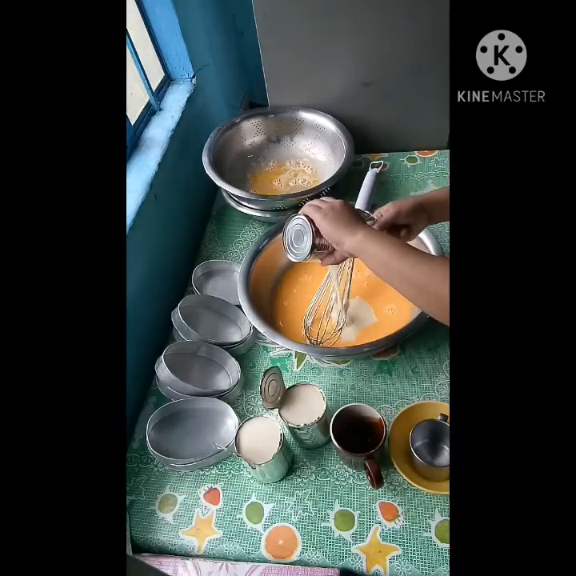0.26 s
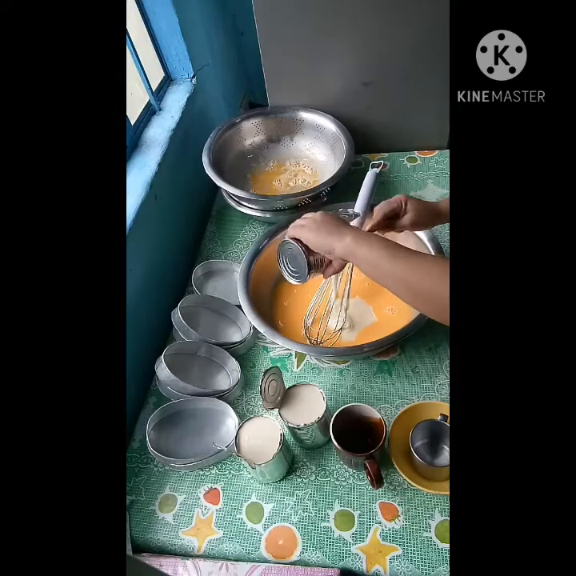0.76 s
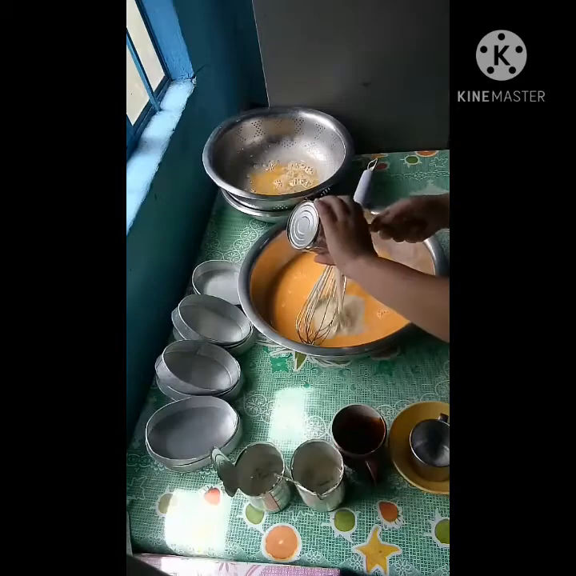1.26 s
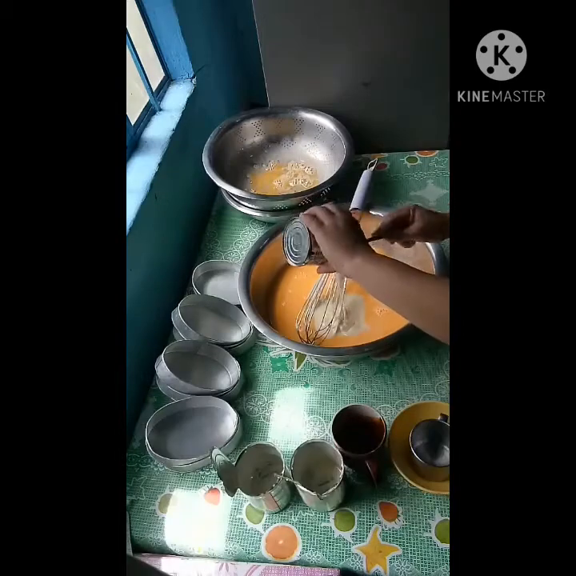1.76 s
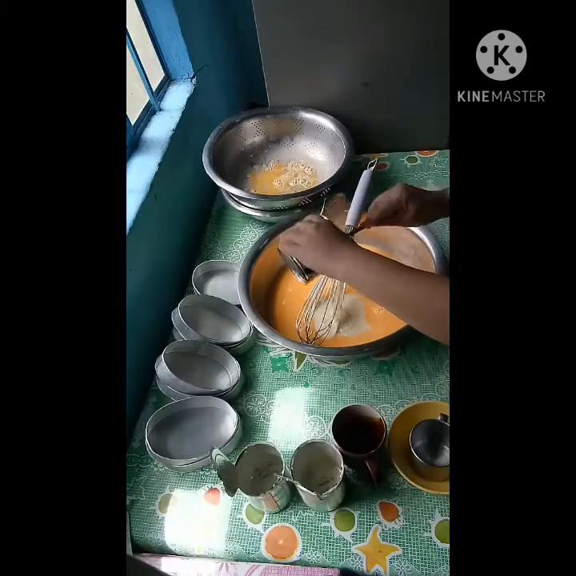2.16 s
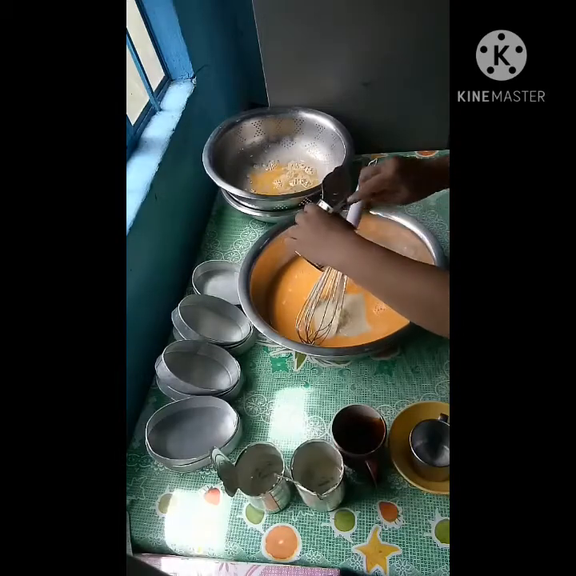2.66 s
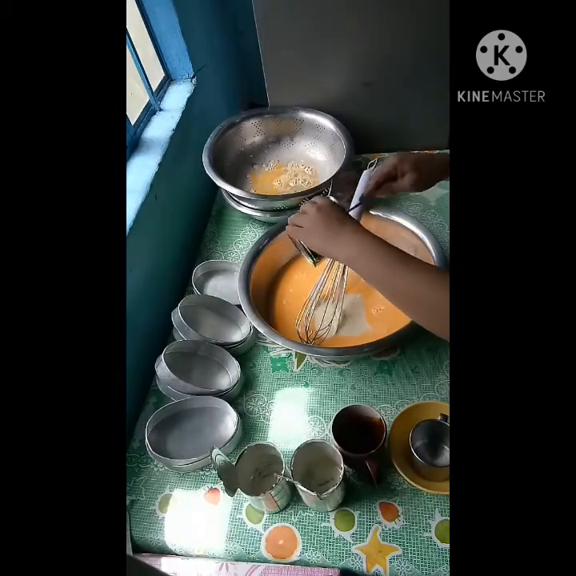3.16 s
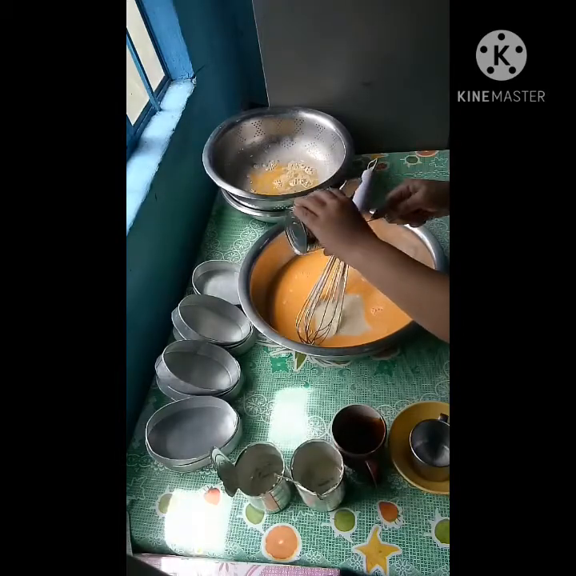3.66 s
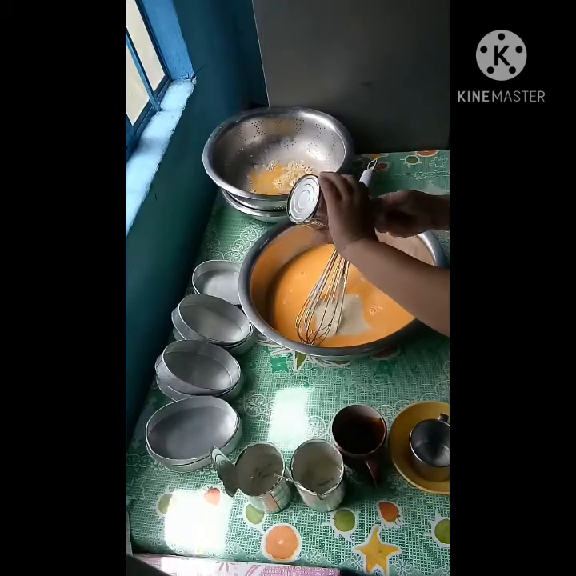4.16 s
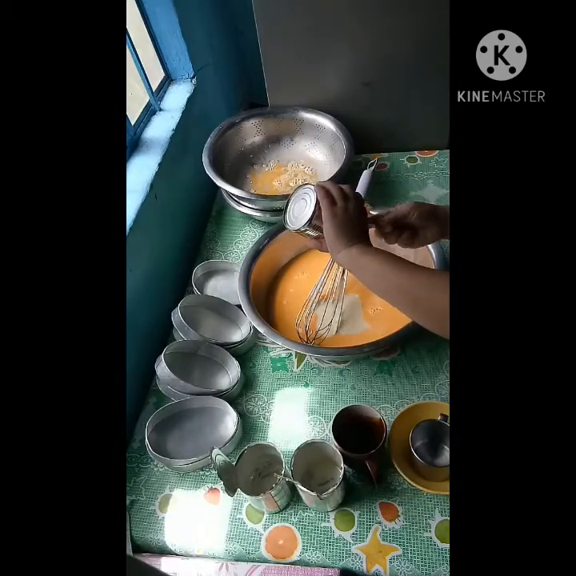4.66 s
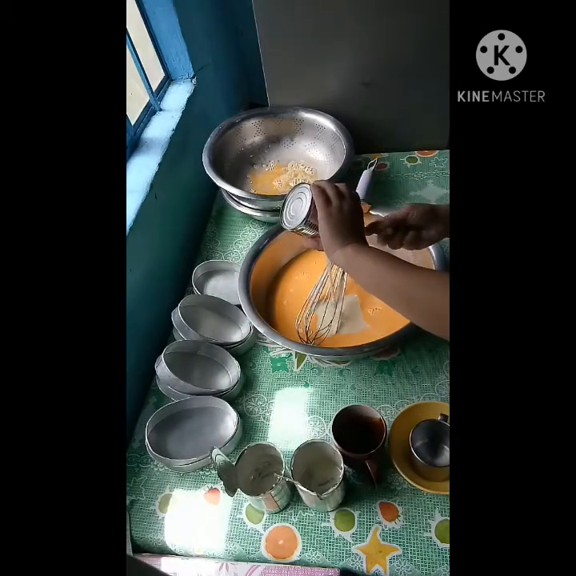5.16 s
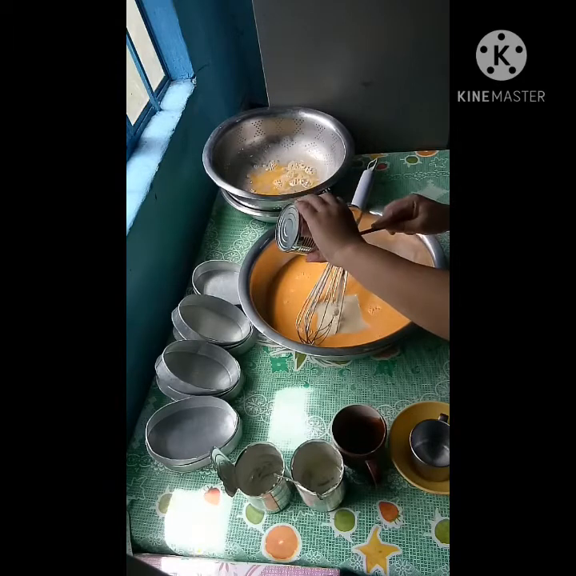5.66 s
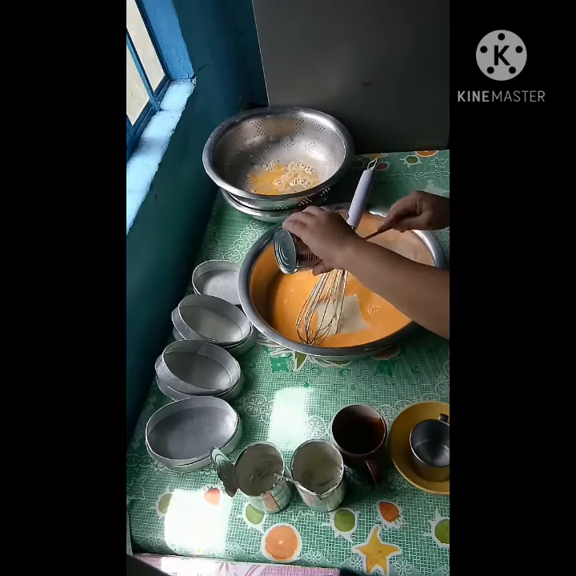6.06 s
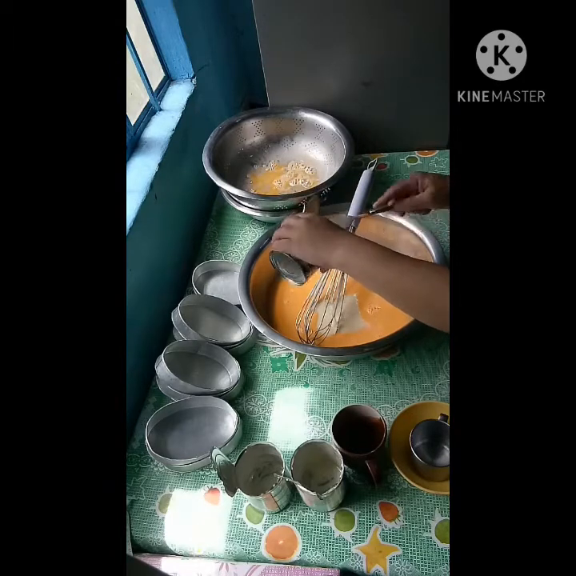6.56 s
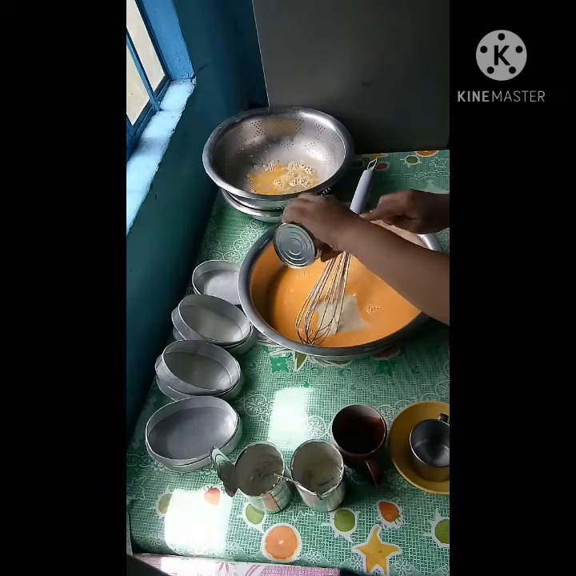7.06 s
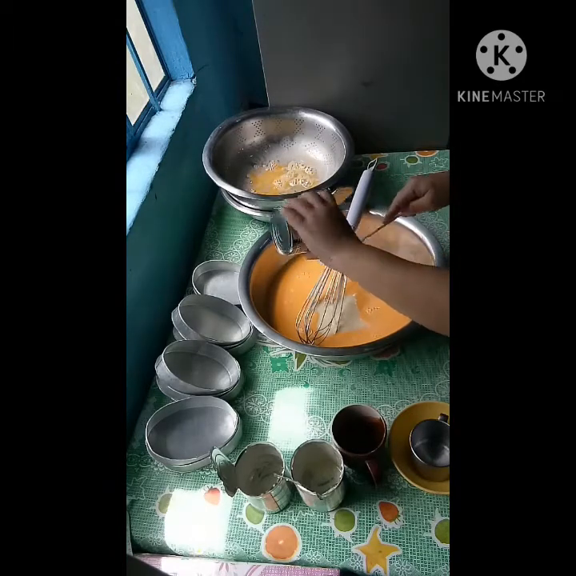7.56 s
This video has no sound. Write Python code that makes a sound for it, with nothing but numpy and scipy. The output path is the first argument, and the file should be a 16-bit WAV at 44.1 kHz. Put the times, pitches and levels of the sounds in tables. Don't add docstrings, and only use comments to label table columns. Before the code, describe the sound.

Bright, dry clanks and gritty scrapes of steel against thin tin cans, irregular and close, over quiet room tone with distant traffic and birds outside.

```python
import sys
import numpy as np
from scipy import signal
from scipy.fft import rfft, irfft, next_fast_len
from scipy.io import wavfile
from scipy.ndimage import uniform_filter1d, map_coordinates

SR = 44100
rng = np.random.default_rng(int(sys.argv[2]) if len(sys.argv) > 2 else 0)


def volts_from_db(level):
    exponent = np.asarray(level, float) / 20
    return 10 ** exponent


def transcribe(u):
    v = np.clip(np.atleast_2d(u).T, -1, 1)
    q = np.round(v * 32767).astype(np.int16)
    wavfile.write(sys.argv[1], SR, q)


N = 344421


def unit(x):
    return x / np.sqrt(np.mean(x ** 2) + 1e-20)


def along(points, hz):
    f, v = np.transpose(points)
    return np.interp(np.log(hz + 1), np.log(f + 1), v)


def curves(rows):
    s, *cols = np.transpose(rows)
    return [np.interp(np.arange(N) / SR, s, c) for c in cols]


def wobble(rate):
    knots = rng.standard_normal(int(N * rate / SR) + 4)
    return map_coordinates(knots, [np.arange(N) * rate / SR])


def filtered(x, response):
    m = 2 * next_fast_len(x.shape[-1] // 2 + 2048)
    spectrum = rfft(x, m) * response(np.fft.rfftfreq(m, 1 / SR))
    return irfft(spectrum, m)[..., :x.shape[-1]]


def causal(gain):
    cep = irfft(np.log(gain + 1e-6))
    half = len(cep) // 2
    folded = np.r_[cep[0], 2 * cep[1:half], np.zeros(len(cep) - half)]
    return np.exp(rfft(folded, 2 * len(gain) - 2))


def peak_db(t, s, rise, fall):
    before = (s - t) / np.maximum(rise, .003)
    after = (t - s) / np.maximum(fall, .02)
    return -20 * np.maximum(before, after)


# frequency in Hz, level in dB.
AIR_SPECTRUM = [(76, -34), (130, -8), (238, -11.5), (303, -11.5), (1010, -23), (1310, -25.5), (5480, -27),
                (8190, -39), (15000, -37.5), (15500, -28)]
# top in seconds, level in dB, time to rise or fall 20 dB in seconds.
TRAFFIC_SWELLS = [
    (.68, -42.5, 0.5),
    (1.8, -49, 0.2),
    (3.27, -60, 2),
    (3.85, -45, .5),
    (5.2, -53, 1),
    (7.57, -57, 1.3),
]
AIR_DB, RUMBLE_DB = -56.5, -60.5


def background():
    air = unit(filtered(rng.standard_normal(N), lambda f: volts_from_db(along(AIR_SPECTRUM, f)) * (f > 130)))
    rumble_db = [(15, -5.5), (55, -2.5), (73, 9.5), (92, 6.5), (150, -9.0), (300, -50.5)]
    low = filtered(rng.standard_normal(N), lambda f: volts_from_db(along(rumble_db, f)))
    t = np.arange(N) / SR
    swells = sum(volts_from_db(db - 6.5 + peak_db(t, s, fall, fall)) for s, db, fall in TRAFFIC_SWELLS)
    traffic = volts_from_db(RUMBLE_DB) + swells
    breeze = volts_from_db(1.0 * wobble(8.9))
    lumps = volts_from_db(1.6 * wobble(8.7))
    return volts_from_db(AIR_DB) * breeze * air + traffic * unit(lumps * low)


GRIP_STARTS = [0, 1.06, 1.66, 2.15, 3.97, 7.8]
# start in seconds, wall mode in Hz, bottom mode in Hz, upper mode in Hz.
STROKE_SPOTS = [(0, 406.2, 707.6, 2640), (0.11, 521.5, 708, 2870), (0.24, 510, 709, 3460),
                (0.36, 524, 722, 2570), (0.536, 404.3, 836, 2850), (0.682, 431.7, 733, 3058),
                (0.775, 403, 715, 2840), (0.856, 412, 709, 2480), (1.078, 364, 795, 2520),
                (1.204, 470, 707, 1820), (1.29, 365, 1035, 1880), (1.348, 335, 785, 2160),
                (1.42, 317, 726, 1739), (1.52, 380, 722, 5310), (1.595, 370, 735, 2630),
                (1.682, 357, 1029, 2776), (1.778, 357, 785, 3570), (1.861, 354, 785, 3430),
                (2.207, 317, 786, 2540), (2.424, 372, 842.6, 3003), (2.544, 345, 730, 4210),
                (2.67, 305, 785, 4600), (2.78, 382, 872, 2600), (2.92, 374, 845.7, 3820),
                (3.159, 521, 820, 4040), (3.385, 313, 817.5, 3907), (3.614, 393, 762, 4420),
                (3.733, 530, 824, 3650), (3.833, 430, 827, 1940), (3.976, 434, 785, 2820),
                (4.18, 423, 834, 2470), (4.295, 436, 1017, 4820), (4.395, 460, 768.6, 2200),
                (4.527, 439.5, 808, 3840), (4.751, 451, 812, 2690), (5.007, 450, 785, 3601),
                (5.262, 436.7, 791, 3000), (5.521, 463, 772, 2870), (5.737, 462, 770, 3360),
                (5.952, 450, 800, 2920), (6.316, 470.7, 874, 3780), (6.741, 468, 785, 3970),
                (6.815, 482, 1000, 2840), (6.919, 466, 1000, 2910), (7.069, 442, 785, 2944),
                (7.26, 470, 780, 2950), (7.356, 470, 761, 2960)]


def stroke_at(s):
    stroke = np.searchsorted(np.transpose(STROKE_SPOTS)[0], s + .005) - 1
    grip = np.searchsorted(GRIP_STARTS, s) - 1
    return max(stroke, 0), max(grip, 0)


def modes(f, table, scatter_db, detune):
    luck = np.clip(rng.standard_normal((9, 2)), -1.5, 1.5)
    total = 0
    for k, ((hz, width, db), (strength, shift)) in enumerate(zip(table, luck)):
        centre = hz * (1 + detune * shift)
        resonance = 1j * f * width / (centre ** 2 - f * f + 1j * f * width)
        total = total + (-1) ** k * volts_from_db(db + scatter_db * strength) * resonance
    return total


# frequency in Hz, width in Hz, level in dB.
WALL_MODES = [
    [(419, 36, 2), (543.5, 12, -6)],
    [(357, 54, 0.5), (424, 20, -1)],
    [(403.5, 51, -9), (301.6, 16, -3)],
    [(453.4, 6.9, 1.5), (310, 26, -27)],
]
# frequency in Hz, width in Hz, level in dB.
BOTTOM_MODES = [
    [(733, 21, 5), (805, 7, 1.5), (870, 570, -12), (1190, 35, -16)],
    [(724.6, 26, 5), (602, 10, -24), (1062, 140, -13.5)],
    [(785, 61, -3.5), (891, 21, -12), (1066, 50, -17)],
    [(740, 143, -9.5), (785, 40, -0.5), (834, 40, -2), (872, 74, -1), (934, 52, -0.5), (1071, 190, -8),
     (1270, 132, -20.5)],
    [(633, 16.4, -11), (795, 23, -2.5), (841, 23, 1.5), (890.4, 39, -1), (1013, 87, -1), (1033, 105, 0),
     (1144, 170, -7)],
]
# frequency in Hz, width in Hz, level in dB.
UPPER_MODES = [
    [(2450, 310, 1), (2950, 120, 1), (3180, 250, -1.5), (4500, 53, -24)],
    [(1806, 66, -3.5), (2880, 180, 0), (3550, 120, 0.5), (5500, 71, -8)],
    [(1717, 110, -1), (2236, 77, -14.5), (2740, 50, -37.5), (4070, 58, 2), (4570, 350, -12.5)],
    [(1802, 186, -1), (1910, 170, -4.5), (2400, 650, -3), (2904, 88, -5.5), (3390, 300, 4)],
]
# frequency in Hz, level in dB.
SHEET_SPECTRUM = [(760, -6.5), (1300, -2.5), (1480, -6.5), (2920, -3.5), (6540, -6.5), (7400, -32),
                  (9620, -64.5), (16300, -120)]
# frequency in Hz, level in dB.
EDGE_SPECTRUM = [(5500, -58.5), (6800, -9.5), (7700, -13), (10000, -7), (13300, -18.5), (14200, -12.5),
                 (14900, -4.5), (15500, -7.5)]
CAN_IN_GRIP = [0, 1, 1, 2, 3]
# width in Hz, level in dB.
FAVOURED_MODE = [
    (20, 4),
    (32, 3.5),
    (150, 1.5),
]


def tin(s, scatter_db, detune, spot_db):
    stroke, grip = stroke_at(s)
    can = CAN_IN_GRIP[grip]
    families = []
    for table, hz, lead in zip([WALL_MODES[can], BOTTOM_MODES[grip], UPPER_MODES[can]],
                               STROKE_SPOTS[stroke][1:], FAVOURED_MODE):
        others = [m for m in table if abs(m[0] / hz - 1) > .035]
        families.append(others + [(hz, *lead)])
    wall, bottom, upper = families
    spot = rng.standard_normal(60)
    spot_hz = np.linspace(0, SR / 2, len(spot))

    def response(f):
        groups = volts_from_db(spot_db * np.interp(f, spot_hz, spot))
        radiates = (1j * f / (310 + 1j * f)) ** 2
        sheet = causal(groups * volts_from_db(along(SHEET_SPECTRUM, f)))
        return radiates * np.array([
            modes(f, upper, scatter_db, detune) * volts_from_db(-2.0) + sheet,
            modes(f, wall, scatter_db, detune / 4),
            modes(f, bottom, scatter_db, detune / 4),
            causal(np.sqrt(groups) * volts_from_db(along(EDGE_SPECTRUM, f)))])
    return response


def patchy(depth_db, size):
    z = signal.stft(rng.standard_normal(N), nperseg=size)[2]
    field = uniform_filter1d(rng.standard_normal(z.shape), 2, axis=0)
    field = uniform_filter1d(field, 7, axis=1)
    return signal.istft(z * volts_from_db(depth_db * unit(field)), nperseg=size)[1][:N]


# start in seconds, rasp in dB, time to fall 20 dB
# in seconds, wall in dB, bottom in dB.
DRAG_STROKES = [(0, -28, 0.2, -1.5, -9.5), (.262, -31.5, 0.23, -11, -9), (1.09, -31, 0.14, -14, 0.5),
                (1.215, -30, 0.27, -6.5, 0), (1.428, -38, 0.16, 0, 10.5), (1.602, -43.5, 0.3, -17, 7),
                (2.218, -29, 0.12, -21.5, -3.5), (2.437, -27, -0.21, -9, 0), (2.682, -24.5, 0.16, -10, -3),
                (3.17, -30.5, 0.17, -17.5, 4.5), (3.4, -34, 0.3, -5, 4), (3.625, -27, 0.12, -8, 4),
                (3.844, -42, 0.7, 2, 9), (4.04, -29, 0.41, -3.5, 2.5), (4.268, -25.5, 0.34, -8, -8),
                (4.762, -25, 0.2, -2, 2), (5.015, -28, 0.26, -5, -1.5), (5.27, -30, 0.47, -4, -8),
                (6.329, -32.5, 0.19, -4, -8), (6.755, -30, 0.07, -6, 11), (6.935, -37.5, 0.62, -18, -2),
                (7.087, -35, 0.32, 3, -1.5), (7.376, -38, 0.1, 11.5, 0)]
# top in seconds, rasp in dB, time to fall 20 dB in seconds,
# wall in dB, bottom in dB.
SWEEP_STROKES = [(.57, -35.5, 0.52, -6, -6), (.675, -26, 0.14, -1.5, -7), (.788, -25, -0.0235, -1, 0.5),
                 (.868, -33.5, 0.07, 0.5, -10.5), (1.535, -30.5, 0.1454, -16.5, 1.5),
                 (1.7, -30, 0.17, -31, -2.5), (1.79, -31.5, 0.22, -5, 6.5), (1.89, -25.5, 0.11, -6.5, 3),
                 (2.559, -27, 0.08, -14, -4), (2.784, -29.5, 0.09, -5, 1.5), (3.018, -32, 0.11, -12.5, 3.5),
                 (3.99, -32.5, 0.04, -30, -8), (4.4, -27.5, 0.25, -8, 0), (4.659, -32, 0.12, -13, 3),
                 (5.52, -33.5, 0.13, -12, 1), (5.6, -21, 0.07, 2.5, -2.5), (5.765, -28.5, 0.0827, 5.5, 8),
                 (5.95, -38, 0.1143, -7, 7.5), (6.4, -25.5, 0.03, -13, -2.5), (6.89, -33, 0.04, -10, -1),
                 (7.28, -43.5, 0.07, 10.5, 5)]
LINGER_RATIO = [0.96, 0.58, 1, 0.81]
GRIP_RASP_EDGE_DB = [-0.36, -1, -1.2, -1.2, 0.96]
DRAG_RISE_S, SWEEP_RISE = 0.016, 0.9
GENTLE_FROM_S, GENTLE_EDGE_DB = 5, -4


def pressure():
    t = np.arange(0, N / SR + .002, .002)
    power = 1e-12
    for rows, sudden in [(DRAG_STROKES, True), (SWEEP_STROKES, False)]:
        for s, db, fall, wall_db, bottom_db in rows:
            grip = max(np.searchsorted(GRIP_STARTS, s) - 1, 0)
            edge_db = GRIP_RASP_EDGE_DB[grip] + GENTLE_EDGE_DB * (s > GENTLE_FROM_S)
            rise = DRAG_RISE_S if sudden else SWEEP_RISE * fall
            shape_db = peak_db(t, s, rise, fall * np.c_[LINGER_RATIO])
            power = power + volts_from_db(2 * (db + np.c_[[0, wall_db, bottom_db, edge_db]] + shape_db))
    return np.array(curves(np.c_[t, np.sqrt(power).T]))


STROKE_EDGE = [1, 2.5, 1.5, -5, -1, -3.5, -2, -5, -2, 1, -0.5, -1.5, 1.5, -1, -4, 1.5, -1.5, 0.5, -3, 2, -2,
               2, -1.5, 1.5, 4, 3, 4.5, -0.5, 0.5, 0, 0, 2.5, -0.5, -0.5, 0.5, 3, -0.5, 1, 4, 1.5, 1.5, 0.5,
               4.5, -1, -3.5, -1, -1]


def scrape():
    chatter = volts_from_db(1.8 * wobble(30) + 2.5 * wobble(110) + 2 * wobble(600))
    bumps = volts_from_db(3 * wobble(35))
    steady = np.ones(N)
    grains = patchy(depth_db=3.0, size=512)
    force = chatter * np.array([steady, bumps, bumps, steady]) * grains
    shares = pressure() * volts_from_db(np.c_[[-3.5, -5, -5.5, -3.5]])
    out, t = np.zeros(N), np.arange(N) / SR
    starts = [row[0] for row in STROKE_SPOTS]
    for a, b, edge_db in zip(starts, starts[1:] + [N / SR], STROKE_EDGE):
        here = slice(max(round((a - .06) * SR), 0), round((b + .01) * SR))
        parts = filtered(force[:, here], tin(a, scatter_db=2, detune=0.02, spot_db=1.4))
        fade_in = (t[here] - a) / .01 + (1 if a > .05 else 9)
        fade_out = (b - t[here]) / .01 + 1
        fade = np.sqrt(np.clip(np.minimum(fade_in, fade_out), 0, 1))
        gains = shares[:, here] * volts_from_db(np.c_[[0, 0, 0, edge_db]])
        out[here] += fade * sum(g * unit(p) for g, p in zip(gains, parts))
    return out


# start in seconds, peak in dB, bottom in dB, contact t60 in seconds.
FIRST_CAN_TAPS = [(.026, -19.5, -7, 0.016), (.1156, -15.5, -12.5, 0.062), (0.2414, -12.5, -11.5, 0.022),
                  (.2612, -13, -5, 0.018), (.3168, -18, -5.5, 0.029), (0.3645, -13, -15.5, 0.037),
                  (0.5358, -24, -23, 0.091), (0.685, -6, -16, 0.045), (0.7799, -17, -12, 0.095),
                  (0.8587, -15, -17, 0.064)]
SECOND_CAN_TAPS = [(1.2052, -10.5, 0, 0.025), (1.2915, -22, -11, 0.15), (1.3495, -18.5, -12.5, 0.016),
                   (1.4217, -17, -5.5, 0.027), (1.5968, -30.5, 9.5, 0.0063), (1.8634, -28.5, -7, 0.016),
                   (1.954, -27.5, 0.5, 0.093)]
THIRD_CAN_TAPS = [(2.2079, -6, -7, 0.037), (2.4243, -4.5, -3, 0.024), (2.4923, -16.5, -9, 0.15),
                  (2.5468, -18.5, -5.5, 0.13), (2.6703, -3.5, -4, 0.034), (2.7171, -12, -8.5, 0.013),
                  (2.7824, -23, -1.5, .014), (2.9223, -25.5, -6.5, 0.093), (3.0094, -32.5, 4, 0.021),
                  (3.158, -11.5, 1.5, 0.044), (3.251, -22, -6, 0.098), (3.375, -29.5, 1.5, 0.042),
                  (3.386, -12, -4, 0.019), (3.462, -18.5, -8, 0.014), (3.5208, -25, -6.5, 0.019),
                  (3.5955, -31.5, 7, 0.018), (3.6133, -4.5, -13.5, 0.015), (3.7334, -21.5, -2, 0.041),
                  (3.8334, -19, 4.5, 0.03)]
FOURTH_CAN_TAPS = [(4.0302, -12.5, -5.5, 0.013), (4.1091, -17, -11.5, 0.015), (4.1786, -23, -5, 0.071),
                   (4.244, -11, -9, 0.052), (4.2667, -15.5, -4.5, 0.019), (4.295, -5.5, -8, 0.0084),
                   (4.3949, -18, -0.5, 0.038), (4.438, -11, -11.5, 0.013), (4.527, -23.5, 3, 0.024),
                   (4.653, -17, -26.5, 0.03), (4.7496, -13.5, -7, 0.033), (4.7694, -12.5, -9.5, 0.022),
                   (5.003, -14, -4.5, 0.039), (5.0081, -5.5, -15, 0.011), (5.1198, -19.5, -3.5, 0.07),
                   (5.2613, -7, -7.5, 0.037), (5.3084, -11.5, -8.5, 0.092), (5.3716, -18, 0, 0.042),
                   (5.5816, -13, -13.5, 0.016), (5.7427, -25, -8, 0.027), (5.7848, -13.5, -11, 0.028),
                   (5.9526, -16, -10, 0.059),
                   (6.3179, -17.5, -5.5, 0.015), (6.7415, -16.5, -9, 0.02), (6.752, -12, -30.5, 0.038),
             (6.8141, -18.5, -5, 0.022), (6.9194, -7.5, -25.5, 0.033), (7.0199, -26.5, -4.5, 0.0415),
             (7.0691, -13, -27, 0.057), (7.2602, -30, 2, 0.05), (7.356, -23, -7.5, 0.096),
             (7.4133, -26.5, -21, 0.017)]
# start in seconds, peak in dB, bottom in dB, contact t60 in seconds.
SMALL_CONTACTS = [
    (0.444, -23, -26, 0.031),
    (1.4, -26.5, -9, 0.013),
    (5.147, -20, -13, 0.016),
    (5.399, -18.5, -8.5, 0.063),
    (7.13, -28, -15, 0.013),
                  (.1027, -27, -16.5, 0.016), (.338, -18, -8, 0.019), (.5028, -36, -14, .01),
                (.6345, -23, -11, 0.023), (.7562, -15.5, -6, 0.053), (.85, -17, -10, 0.014),
                (.9792, -34, -29, 0.0089), (1.0914, -24.5, -5.5, 0.023), (1.3249, -24.5, -9, 0.011),
                (1.5184, -30.5, 1, 0.016), (1.6601, -32.5, -10, 0.016), (1.6796, -29, -8.5, 0.017),
                (1.8816, -16.5, -7.5, 0.02), (2.6592, -24, -33.5, 0.0046), (2.693, -28, -5, 0.02),
                (2.7619, -18.5, -20, .02), (2.9884, -22.5, -15.5, 0.014), (3.038, -28, 0.5, 0.0085),
                (3.9822, -29, -11, 0.036), (4.134, -26.5, 3, 0.013), (4.6038, -27, 0.5, .02),
                (4.6975, -26, -7, 0.013), (4.7584, -18, -7, 0.015), (4.8841, -19, -10, 0.041),
                (5.038, -18, -5, .01), (5.082, -23, -1.5, .015), (5.4798, -27.5, -8, 0.009),
                (5.5022, -27.5, -9.5, 0.014), (5.5297, -19, -9, 0.021), (5.607, -15.5, -5.5, 0.012),
                (5.7177, -30, -18, 0.0063), (5.734, -16.5, -4, 0.022), (5.7731, -19, -1, 0.006),
                (5.9208, -35, -22, 0.012), (6.8826, -26.5, -3.5, 0.018), (6.898, -26.5, -1, 0.013)]
# wall in dB, edge in dB.
GRIP_FREEDOM = [
    (-14, -12),
    (-23.5, -11.5),
    (-19, -17),
    (-26, -14.5),
    (-15, -18),
]
WALL_FOLLOWS, EDGE_YIELDS = 0.27, 0.18
PUSH_S, PUSH = 0.001486, 2.07


def taps():
    out, t = np.zeros(N + SR), np.arange(SR // 7) / SR
    contacts = (FIRST_CAN_TAPS + SECOND_CAN_TAPS + THIRD_CAN_TAPS + FOURTH_CAN_TAPS + SMALL_CONTACTS)
    for s, db, bottom_db, t60 in contacts:
        stroke, grip = stroke_at(s)
        wall_db = GRIP_FREEDOM[grip][0] + WALL_FOLLOWS * bottom_db
        edge_db = GRIP_FREEDOM[grip][1] - EDGE_YIELDS * bottom_db + STROKE_EDGE[stroke]
        lasting = np.clip(t60, .006, .2) * np.array([[1], [.2], [.2], [.9]])
        force = rng.standard_normal(len(t)) * volts_from_db(-60 * t / lasting) * (1 - np.exp(-t / 0.0021))
        force[1:3, round(PUSH_S * SR)] += PUSH * np.sqrt(np.sum(force[1] ** 2) / 4)
        parts = filtered(force, tin(s, scatter_db=2.5, detune=0.02, spot_db=2.3))
        parts = parts / np.abs(parts).max(axis=1, keepdims=True)
        levels = volts_from_db(db + np.array([-1, wall_db + 4.5, bottom_db + 4, edge_db + 7.5]))
        out[round(s * SR):][:len(t)] += levels @ parts
    return out[:N]


# frequency in Hz, t60 in seconds.
KITCHEN_DECAY = [(200, 0.5), (800, 0.24), (4000, 0.23), (12000, 0.26)]


def room(x):
    out, step = np.zeros(N + SR), SR // 4
    for start in range(0, N, step):
        hz, t, z = signal.stft(rng.standard_normal(SR // 2), SR, nperseg=256)
        decay = volts_from_db(-60 * t / along(KITCHEN_DECAY, hz)[:, None])
        tail = signal.istft(z * decay, SR, nperseg=256)[1]
        wet = signal.fftconvolve(x[start:start + step], tail / np.linalg.norm(tail))
        out[start + 220:][:len(wet)] += wet
    return out[:N]


# start in seconds, end in seconds,
# share of the bands from 4.5 to 11 kHz.
WIDE_STRETCHES = [(0, 1.03, .3), (1.2, 1.24, .9), (2.2, 2.22, 1), (2.41, 2.45, 1), (2.66, 2.68, 1),
                  (2.91, 3.61, .4), (4.16, 4.23, .9), (4.28, 4.33, 1), (4.99, 6.07, .3), (6.31, 6.41, .5),
                  (6.75, 7.5, .35)]


def wide_treble(x):
    hz, t, z = signal.stft(x, SR, nperseg=512)
    share = sum(part * ((t > a) & (t < b)) for a, b, part in WIDE_STRETCHES)
    luck = np.kron(rng.random((34, len(t) // 8 + 1)), np.ones((8, 8)))[:len(hz), :len(t)]
    f = hz[:, None]
    on = np.where((f > 11000) & (f < 14500), share > 0, (luck < share) & (f > 4500))
    strength = np.sqrt(np.abs(uniform_filter1d(np.abs(z) ** 2, 7, axis=0)))
    noise = signal.stft(rng.standard_normal(N), nperseg=512)[2]
    noise = noise / np.sqrt(np.mean(np.abs(noise) ** 2))
    return signal.istft(on * strength * noise, nperseg=512)[1][:N]


# start in seconds, end in seconds.
CUT_SILENCE = (1.0425, 1.081)


def cut(x):
    t = np.arange(N) / SR
    burst = np.exp(-((t - CUT_SILENCE[0] + 0.0037) / 0.0012) ** 2)
    tick = volts_from_db(-38.5) * rng.standard_normal(N) * burst
    heard = (t < CUT_SILENCE[0]) | (t > CUT_SILENCE[1])
    return (x + np.diff(tick, prepend=0)) * heard


# start in seconds, length in seconds, start pitch in Hz, end pitch in Hz,
# level in dB.
SPARROW_NOTES = [
    (2.07, .06, 4300, 4100, -65),
    (3.08, .07, 4800, 4700, -57),
    (6.053, .085, 3830, 3780, -48),
    (6.52, .085, 3620, 3540, -54),
    (7.548, .045, 3950, 3700, -50),
    (7.5, .09, 3300, 3250, -56),
]


def sparrows():
    line, slide = np.zeros((2, N))
    flutter_hz, shimmer = 22 * wobble(150), volts_from_db(2.5 * wobble(80))
    for s, length, start_hz, end_hz, db in SPARROW_NOTES:
        voices = [(line, 0, length, start_hz, end_hz, 1), (slide, .05, .13, 4750, 3100, 9)]
        for out, lead, span, top_hz, low_hz, hoarse in voices:
            u = np.arange(round(span * SR)) / (span * SR)
            first = round((s - lead) * SR)
            here = slice(first, first + len(u))
            pitch = top_hz + (low_hz - top_hz) * u + hoarse * flutter_hz[here]
            whistle = np.sin(2 * np.pi * np.cumsum(pitch) / SR)
            breath = (1 - np.exp(-u / 0.042)) * (1 - u) ** .5
            out[here] += volts_from_db(db) * shimmer[here] * whistle * breath
    echo = room(volts_from_db(-2) * line + volts_from_db(-1.5) * slide)
    return volts_from_db(2.5) * line + volts_from_db(-8) * slide + echo


# start in seconds, peak in dB, pitch in Hz, t60 in seconds.
HAND_JOLTS = [
    (3.84, -46.5, 150, 0.13),
    (4.294, -31, 187, 0.11),
    (4.439, -41.5, 170, .2),
    (5.004, -32, 201, 0.15),
    (5.31, -36, 172, 0.14),
    (6.92, -36.5, 141, 0.13),
]


def jolts():
    t, out = np.arange(N) / SR, np.zeros(N)
    for s, db, hz, t60 in HAND_JOLTS:
        onset = 1 - np.exp(-np.maximum(t - s, 0) / 0.01)
        out += volts_from_db(db - 60 * np.abs(t - s) / t60) * onset * np.sin(2 * np.pi * hz * (t - s))
    return out


def scene():
    hits, rasp = taps(), scrape()
    reflections = room(volts_from_db(-4.5) * hits + volts_from_db(-7.5) * rasp)
    mono = hits + rasp + reflections + jolts() + sparrows() + background()
    return np.array([mono, mono])


def low_pass(x):
    return signal.sosfilt(signal.butter(12, 16800, fs=SR, output="sos"), x)


def record(dry):
    side = volts_from_db(-8.3) * wide_treble(dry[0])
    mix = cut(dry + np.array([side, -side]))
    mix = filtered(mix, lambda f: f < 15470)
    return low_pass(np.clip(mix, -.98, .98))


dry = scene()
out = record(dry)
transcribe(out)
```